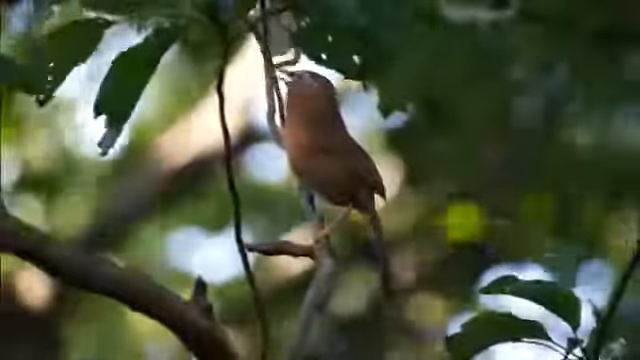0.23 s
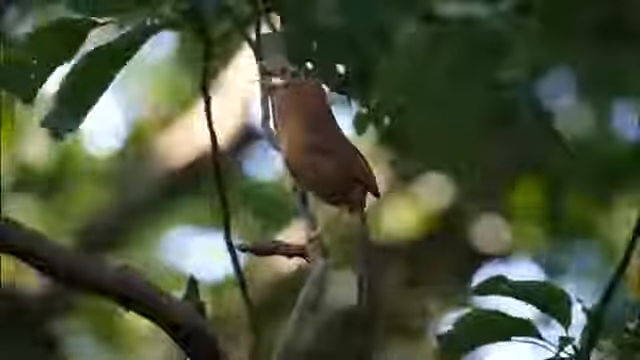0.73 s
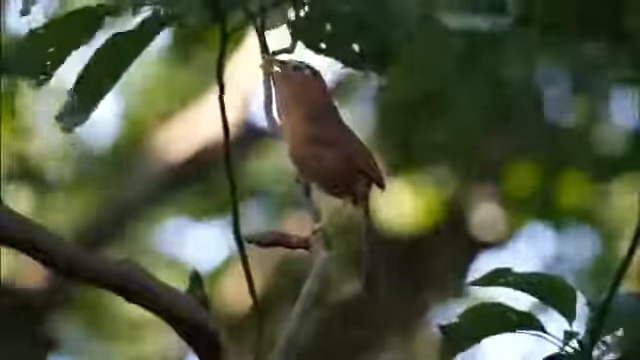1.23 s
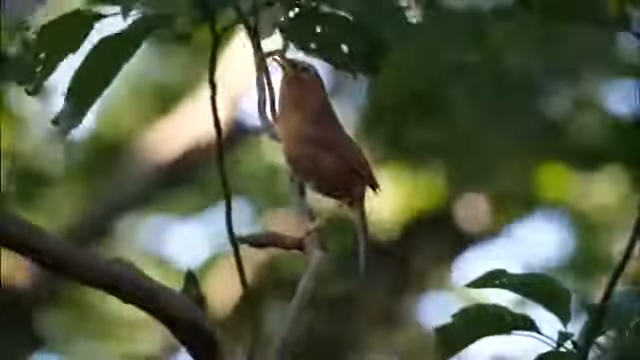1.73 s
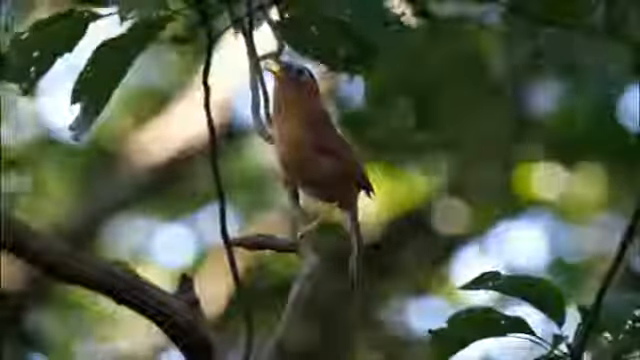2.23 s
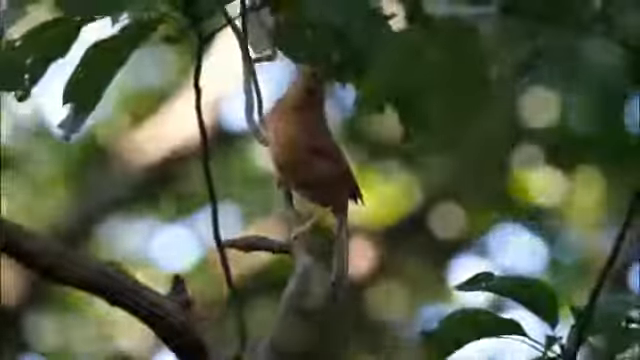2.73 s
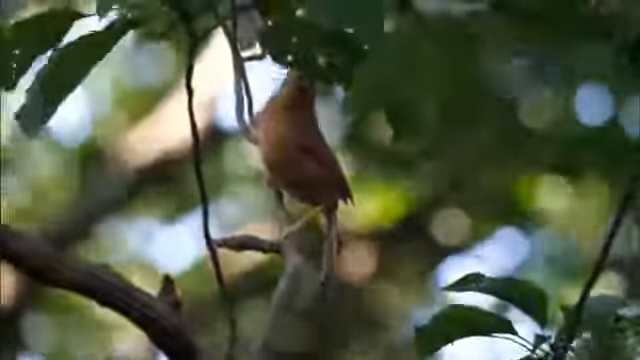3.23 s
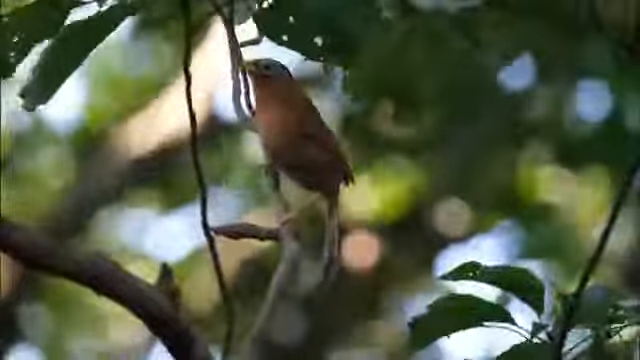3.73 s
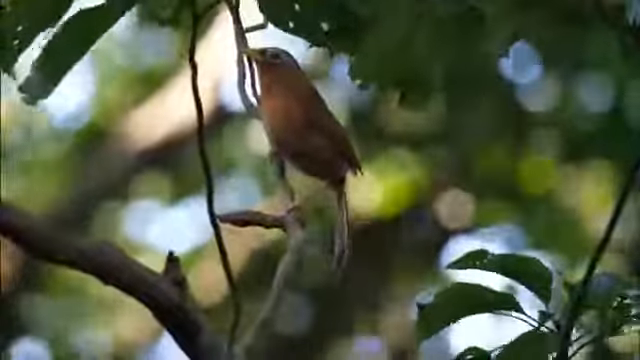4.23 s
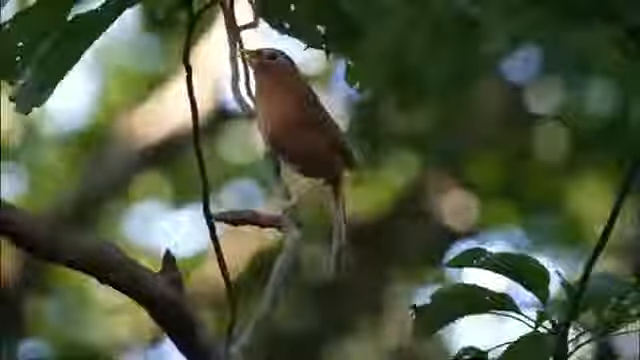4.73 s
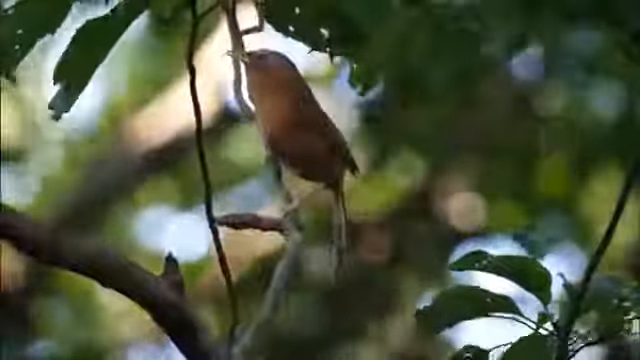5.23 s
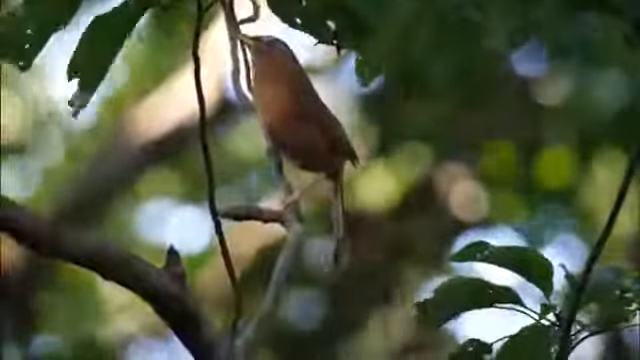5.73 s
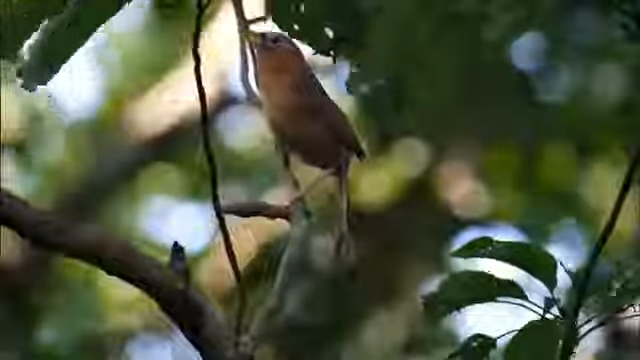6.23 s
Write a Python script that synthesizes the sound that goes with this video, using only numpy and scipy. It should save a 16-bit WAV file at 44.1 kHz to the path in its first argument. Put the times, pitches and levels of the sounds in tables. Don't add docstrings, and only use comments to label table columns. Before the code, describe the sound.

A close songbird sings loud buzzy slides and liquid whistles under a high cicada drone, while a crow caws hoarsely in a breezy wood.

```python
import sys
import numpy as np
from scipy import signal
from scipy.fft import rfft, irfft, next_fast_len
from scipy.io import wavfile
from scipy.ndimage import uniform_filter1d, map_coordinates

SR = 44100
rng = np.random.default_rng(int(sys.argv[2]) if len(sys.argv) > 2 else 0)


def transcribe(u):
    v = np.clip(np.atleast_2d(u).T, -1, 1)
    q = np.round(v * 32767).astype(np.int16)
    wavfile.write(sys.argv[1], SR, q)


def gain_from_db(level_db):
    decades = np.asarray(level_db, float) / 20
    return 10 ** decades


N = 286209
TIME = np.arange(N) / SR
TAIL_S = 0.008
HUSH = 1.1


def unit(x):
    return x / np.sqrt(np.mean(x ** 2) + 1e-20)


def along(points, hz):
    f, v = np.transpose(points)
    return np.interp(np.log(hz + 1), np.log(f + 1), v)


def curves(rows, t=TIME):
    s, *cols = np.transpose(rows)
    return [np.interp(t, s, c) for c in cols]


def wobble(rate_hz, size=N):
    knots = rng.standard_normal(int(size * rate_hz / SR) + 4)
    return map_coordinates(knots, [np.arange(size) * rate_hz / SR])


def filtered(x, response):
    m = next_fast_len(N + 8192)
    return irfft(rfft(x, m) * response(np.fft.rfftfreq(m, 1 / SR)), m)[..., :N]


def placed(x, pan_db, lag):
    return np.array([gain_from_db(pan_db / 2) * np.roll(x, lag), gain_from_db(-pan_db / 2) * x])


def add(out, start, x):
    out[:, start:start + x.shape[1]] += x[:, :N - start]


def note(rows):
    first_s, end_s = rows[0][0], rows[-1][0] + TAIL_S
    t = np.arange(first_s - 0.006, end_s, 1 / SR)
    t = t[(t >= 0) & (t < (N - 1) / SR)]
    hz, db, *extra = [uniform_filter1d(c, 400, mode="nearest") for c in curves(rows, t)]
    ends = np.clip(np.minimum(t - first_s + 0.007, end_s - t) / 0.0068, 0, 1)
    return round(t[0] * SR), hz, gain_from_db(db) * ends ** 2, *extra


def rush(spectrum, patchy_db):
    z = signal.stft(rng.standard_normal((2, N + 512)), nperseg=512)[2]
    field = uniform_filter1d(rng.standard_normal(z.shape[1:]), 5, 0)
    field = uniform_filter1d(field, 12, 1)
    pair = signal.istft(z * gain_from_db(patchy_db * unit(field)), nperseg=512)[1][:, :N]
    return unit(filtered(pair, lambda hz: gain_from_db(along(spectrum, hz))))


# (frequency [Hz], t60 [s])
WOOD_T60 = [(800, 0.53), (2000, 0.42), (4500, 0.21), (12000, 0.097)]


def trees(x, delay_s, stretch):
    hz, t, z = signal.stft(rng.standard_normal((2, SR // 2)), SR, nperseg=256)
    decay_db = -60 * t / (stretch * along(WOOD_T60, hz)[:, None])
    tail = signal.istft(z * gain_from_db(decay_db), SR, nperseg=256)[1]
    tail = tail * (1 - np.exp(-np.arange(tail.shape[1]) / SR / delay_s))
    return signal.fftconvolve(x[None], tail / np.linalg.norm(tail[0]), axes=1)


def sung(shape, s, hz, db, pan_db, lowest_hz=0):
    rows = [(s + dt, max(f * hz / shape[0][1], lowest_hz), db + level, sum(buzz))
            for dt, f, level, *buzz in shape]
    return rows, pan_db


def syrinx(notes, wet_db, stretch):
    out = np.zeros((2, N))
    for shape, row in notes:
        rows, pan_db = sung(shape, *row)
        start, hz, gain, buzz = note(rows)
        n = len(hz)
        beat_hz = (112 + 0.009 * hz) * (1 + 0.2 * wobble(60, size=n))
        beat = np.cumsum(beat_hz) * 2 * np.pi / SR
        flick = ((1 + np.sin(beat)) / 2) ** 2.2 - 0.15
        bend = buzz * flick * (1 + 0.25 * wobble(120, size=n))
        pitch_hz = hz * (1 + bend + 0.0036 * wobble(60, size=n))
        harsh = np.clip(buzz * 12, 0, 1)
        thin_db = harsh * (-14.5 * flick + 1.48 * wobble(130, size=n))
        size = gain_from_db(thin_db + 1.7 * wobble(40.4, size=n))
        phase = np.cumsum(pitch_hz) * 2 * np.pi / SR
        wave = np.sin(phase) + gain_from_db(-51.5) * np.sin(2 * phase) + gain_from_db(-35) * np.sin(3 * phase)
        tone = np.sqrt(2) * gain * size * wave
        add(out, start, placed(tone, pan_db, 3.3))
        add(out, start, gain_from_db(wet_db) * trees(tone, 0.007, stretch))
    return out


# (time into note [s], pitch [Hz], level re note [dB], upward flick [share of pitch])
SLIDE = [(0, 3720, -20, .25), (.04, 3470, -1, .26), (.13, 3370, -1.5, .2), (.2, 3290, -2, .16),
         (.235, 3230, -10, .14), (.28, 3190, -10, .12), (.298, 3260, -.4, .08), (.38, 3060, -3.5, .08),
         (.43, 2840, -10, .08)]
RISE = [(0, 2380, -26, .08), (.03, 2777, -5.5, .11), (.07, 3250, 0, .19), (.11, 3600, -3, .13),
        (.16, 3920, -7.5, .06), (.215, 3800, -9.5, .04)]
LIFT = [(0, 2200, -16, .09), (.05, 2130, -1.5, .12), (.115, 2070, 0, .12), (.165, 2140, -.4, .05),
        (.195, 2440, -5, .015), (.235, 2615, -4.5, .015), (.28, 2680, -4, .015), (.31, 2670, -17, .01)]
HOLD = [(0, 2350, -14, .034), (.05, 2472, 0, .072), (.09, 2457, -17, .022), (.17, 2442, -11.5, 0),
        (.23, 2445, -19.5, 0), (.28, 2360, -40, 0)]
# (time into note [s], pitch [Hz], level re note [dB])
DIP = [(0, 2970, -28), (.025, 3130, -13), (.05, 2800, -3), (.07, 2200, -2), (.1, 1890, -3), (.16, 2240, -3),
       (.22, 2350, 0), (.26, 2345, -9)]
ARCH = [(0, 2380, -45), (.17, 2540, -21), (.23, 2806, -4), (.27, 2900, 0), (.32, 2815, -15),
        (.345, 2483, -12), (.37, 1845, -22), (.4, 1692, -34), (.47, 1682, -36)]
DROP = [(0, 2430, -8), (.025, 2100, 0), (.05, 1650, -6), (.09, 1560, -10), (.145, 1560, -13),
        (.2, 1590, -24)]
# (time [s], opening pitch [Hz], level [dB], left re right [dB], lowest pitch [Hz])
MELODY = [(SLIDE, (-.03, 3700, -11.5, -4.5, 2850)), (DIP, (.235, 2970, -29, -9.5, 2068)),
          (HOLD, (.55, 2350, -31, -12.5, 2340)), (RISE, (.84, 2380, -22.5, .4, 2370)),
          (DIP, (1.1, 2970, -27, -6, 1890)), (SLIDE, (1.37, 3750, -18.5, -3, 2820)),
          (ARCH, (1.47, 2380, -14, -2.5, 1670)), (LIFT, (2.06, 2200, -28, -5.5, 2060)),
          (DROP, (2.39, 2430, -34, -7, 1600)), (LIFT, (2.68, 2200, -29.5, -3, 2060)),
          (DROP, (3.02, 2430, -30, -6, 1560))]


def near_bird():
    return syrinx(MELODY, -9, 0.9)


# (time into note [s], pitch [Hz], level re note [dB], upward flick [share of pitch])
CHIP = [(0, 2400, -8, .09), (.016, 2700, 0, .1), (.032, 2900, -12, .09)]
SEEP = [(0, 4180, -6, .07), (.02, 4070, 0, .06), (.05, 4090, -7, .04)]
# (time into note [s], pitch [Hz], level re note [dB])
TWEE = [(0, 1500, -10), (.012, 1820, 0), (.026, 1870, -22)]
TYOO = [(0, 1950, -6), (.025, 1730, 0), (.065, 1560, -16)]
FALL = [(0, 3250, -16), (.02, 2850, 0, ), (.045, 2698, -2.5), (.07, 2620, -3)]
# (time [s], opening pitch [Hz], level [dB], left re right [dB])
FAR_CALLS = [(CHIP, (3.96, 2330, -54, -5.5)), (CHIP, (4.377, 2340, -47, -2.2)),
             (CHIP, (4.578, 2510, -45.5, -3)), (CHIP, (4.82, 2440, -45, -10.5)),
             (CHIP, (5.092, 2520, -55, -4)), (CHIP, (5.465, 2380, -60, -8.5)),
             (CHIP, (5.925, 2480, -45.5, -7)), (TWEE, (5.11, 1510, -43, -10.5)),
             (TYOO, (5.195, 2010, -58, -13)), (TWEE, (5.494, 1470, -45, -11)),
             (TYOO, (5.56, 2000, -48, -13)), (TWEE, (5.955, 1580, -42, -9)), (TYOO, (6.03, 1830, -41, -15)),
             (TWEE, (6.478, 1540, -47, -1.5)), (SEEP, (6.27, 4180, -61, -2.2)),
             (FALL, (6.29, 3250, -40, -4))]


def far_birds():
    return syrinx(FAR_CALLS, -5, 0.6)


# (time [s], length [s], top pulse rate [Hz], level [dB], brightness [dB/octave])
CAWS = [
    (1.06, .24, 293, -40, -4.5),
    (2.045, .285, 269, -40.5, 5),
    (2.945, .325, 292, -38.5, 4),
    (3.97, .27, 296, -37.5, 4.5),
    (5.71, .26, 297, -38, 3),
]
# (share of length, pulse rate [Hz], level re caw [dB], hoarseness [0-1], beak tilt [dB/octave])
CAW_SHAPE = [
    (0, 278, -16, .25, -10),
    (.14, 295, -3.5, .07, -7),
    (.4, 286, -.5, .12, 5),
    (.74, 260, -.5, .4, 6.5),
    (1, 237, -11, .75, .5),
]
# (frequency [Hz], level [dB])
CROW_THROAT = [(400, -51.5), (600, -26.5), (860, -7), (1170, 7), (1450, -1), (1750, -10), (2050, -25),
               (3000, -120)]


def crow():
    out = np.zeros((2, N))
    for s, length_s, top_hz, db, bright_db in CAWS:
        rows = [(s + u * length_s, f * top_hz / CAW_SHAPE[1][1], db + level, h, tilt + bright_db)
                for u, f, level, h, tilt in CAW_SHAPE]
        start, hz, gain, hoarse, tilt_db = note(rows)
        n = len(hz)
        hoarse = np.clip(hoarse, 0, 1)
        phase = np.cumsum(hz * (1 + 0.0039 * wobble(48, size=n))) * 2 * np.pi / SR
        stack = np.zeros(n)
        for k in range(2, 10):
            level_db = along(CROW_THROAT, k * hz) + tilt_db * np.log2(k * hz / 1200)
            stack += gain_from_db(level_db + 3.8 * wobble(20, size=n)) * np.sin(k * phase)
        puff = rng.standard_normal(n) * (1 + np.cos(phase))
        f = np.fft.rfftfreq(n, 1 / SR)
        rasp_db = along(CROW_THROAT, f) + (2.5 + bright_db) * np.log2(f / 1200 + 0.01)
        rasp = irfft(rfft(puff) * gain_from_db(rasp_db), n)
        caw = gain * (np.sqrt(1 - hoarse) * unit(stack) + np.sqrt(hoarse) * unit(rasp))
        add(out, start, placed(caw, -14.5, 7.9))
        add(out, start, gain_from_db(-6.5) * trees(caw, 0.056, 0.76))
    return out


# (frequency [Hz], level [dB], t60 [s], right re left [ratio])
TWIG_MODES = [
    (1600, -31.5, 0.0045, 1),
    (3110, -16.5, 0.0059, 1),
    (3720, -17.5, 0.0065, 1),
    (7780, -17, 0.0018, 0.47),
    (13460, -8, 0.0032, -0.55),
]


def twig():
    start = round(4.8746 * SR)
    out, t = np.zeros((2, N)), np.arange(600) / SR
    snap = gain_from_db(-15.5 - 60 * t / 0.004) * np.diff(rng.standard_normal((2, 601)))
    for hz, db, t60_s, right in TWIG_MODES:
        mode = gain_from_db(db - 60 * t / t60_s) * np.sin(2 * np.pi * hz * t)
        snap = snap + np.outer([1, right], mode)
    add(out, start, snap * (1 - np.exp(-t / 0.0001)))
    add(out, start, gain_from_db(-20.5) * trees(snap[0] + snap[1], 0.003, 0.75))
    return filtered(out, lambda hz: hz ** 4 / (hz ** 4 + 1100 ** 4))


def tymbal(rate_hz, jitter, scatter_db, low_hz, high_hz, centre_hz, width_hz, blur):
    cycle = np.floor(np.cumsum(rate_hz * (1 + jitter * wobble(300))) / SR)
    clicks = np.diff(cycle, prepend=0) * gain_from_db(scatter_db * rng.standard_normal(N))
    echoes = rng.standard_normal((2, N))
    drive = np.sqrt(1 - blur) * unit(clicks) + np.sqrt(blur) * echoes
    drive[1] = np.roll(drive[1], 37)

    def ring(c):
        return unit(filtered(drive, lambda f: (1j * f * width_hz / (c * c - f * f + 1j * f * width_hz)) ** 3))

    share = np.clip((centre_hz - low_hz) / (high_hz - low_hz), 0, 1)
    return np.sqrt(1 - share) * ring(low_hz) + np.sqrt(share) * ring(high_hz)


# (time [s], level [dB])
DRONE = [(0, -45), (.55, -46), (1.04, -42.5), (1.33, -47), (1.85, -44), (2.1, -41.5), (2.45, -46.5),
         (2.56, -38.5), (2.71, -38.5), (3.02, -43.5), (3.49, -38.5), (3.95, -41), (4.43, -42), (4.71, -39),
         (4.9, -42), (5.3, -38.5), (5.99, -44), (6.3, -41.5)]
# (frequency [Hz], density [dB per Hz])
UPPER = [(6240, -40), (10300, -16), (11200, -13), (12000, -6), (12800, 3), (13700, 5.5), (14600, -5),
         (15200, -18)]


def high_cicada():
    effort_db = curves(DRONE)[0]
    drum_hz = 8830 - 130 * TIME
    drone = tymbal(700, 0.3, 4.8, 8150, 8634, drum_hz, 1500, 0.92)
    drone_db = effort_db + HUSH * duck_db() + 4 + 1.1 * wobble(9.7) + 1.0 * wobble(35)
    join_s, join_db, join_fades_s = 2.55, 4.5, 1.5
    join = join_db * (TIME > join_s) * np.exp((join_s - TIME) / join_fades_s)
    upper = gain_from_db(effort_db - 17 + join) * rush(UPPER, patchy_db=2.5)
    return gain_from_db(drone_db) * drone * gain_from_db([[1.5], [-1.5]]) + upper


# (time [s], level [dB], resonance [Hz])
RATTLE = [(0, -54, 5970), (.5, -55, 5960), (.65, -48, 5850), (1.1, -47, 5900), (1.85, -52, 5930),
          (1.95, -50, 5300), (2.15, -54.5, 5130), (2.5, -74, 5520)]


def low_cicada():
    db, drum_hz = curves(RATTLE)
    click_hz = 338 - 0.012 * (RATTLE[0][2] - drum_hz)
    rattle = tymbal(click_hz, 0.01, 1.5, 5350, 5900, drum_hz, 870, blur=0.65)
    return gain_from_db(db + HUSH * duck_db() + 1.41 * wobble(8.9)) * rattle * gain_from_db([[1.2], [-1.2]])


# (frequency [Hz], density [dB per Hz])
CHORUS = [(2200, -60.5), (2700, -12.5), (3500, -10), (4300, 4.5), (5200, -12), (6300, 3.5), (7000, 3.5),
          (8000, -38.5)]
# (time [s], level re drone [dB])
CHORUS_LEVEL = [(2.4, -36), (3.5, -24), (4.8, -21), (5.35, -29), (5.8, -21), (6.49, -25)]


def far_chorus():
    return gain_from_db(curves(DRONE)[0] + curves(CHORUS_LEVEL)[0]) * rush(CHORUS, patchy_db=4.5)


def cicadas():
    return filtered(high_cicada() + low_cicada() + far_chorus(), lambda hz: hz < 15000)


# (frequency [Hz], density [dB per Hz])
LEAVES = [(100, -5), (200, -2), (600, -2), (1500, -7), (2100, -13.5), (2600, -23.5), (4000, -61.5)]
# (frequency [Hz], density [dB per Hz])
RUMBLE = [(12, -37.5), (20, -11), (59, 2), (162, -11), (200, -14.5), (260, -42), (440, -120)]
# (time [s], half length [s], rustle gain [dB], rumble gain [dB])
GUSTS = [(.3, .3, -3, 7), (.85, .2, -1.5, 12), (1.3, .2, 3, 0), (1.78, .25, -3, 8), (2.1, .3, 7, 19),
         (2.42, .15, 0, 11), (2.67, .15, 10.5, 3), (3.4, .45, 6, 3), (3.9, .35, 6.5, 20),
         (4.75, .2, -1.5, 6), (5.18, .2, 4, 7), (5.8, .2, 6, 5)]


def air():
    gusts = [np.interp(TIME, [s - half_s, s, s + half_s], [0, 1, 0]) for s, half_s, *_ in GUSTS]
    leaves_db, rumble_db = np.transpose(GUSTS)[2:] @ gusts
    leaves = gain_from_db(-64 + leaves_db) * rush(LEAVES, patchy_db=2.0)
    rumble = gain_from_db(-71.5 + rumble_db + 1.5 * wobble(9)) * rush(RUMBLE, patchy_db=1.0)
    return leaves + rumble


# (time [s], attack [s], depth [dB], held until [s], recovery [s])
DUCKS = [
    (-.1, .05, -6, .3, .25),
    (1.38, .2, -7, 1.82, .12),
    (4.879, .01, -5, 4.99, .22),
]


def duck_db():
    points = []
    for s, attack_s, depth_db, until_s, recover_s in DUCKS:
        points += [(s, 0), (s + attack_s, depth_db), (until_s, depth_db), (until_s + recover_s, 0)]
    return curves(points)[0]


def scene():
    return near_bird() + far_birds() + crow() + twig() + cicadas() + air()


def band_limit(x):
    return signal.sosfilt(signal.butter(12, 17000, fs=SR, output="sos"), x)


# (frequency [Hz], level [dB])
SIDE_KEPT = [(60, -25), (250, -18), (640, -14), (1000, -7), (1400, -4), (2200, -1), (3000, 0)]


def record(dry):
    left, right = dry * gain_from_db(duck_db())
    mid = (left + right) / 2
    side = filtered((left - right) / 2, lambda hz: gain_from_db(along(SIDE_KEPT, hz)))
    return band_limit(np.array([mid + side, mid - side]))


dry = scene()
out = record(dry)
transcribe(out)
```